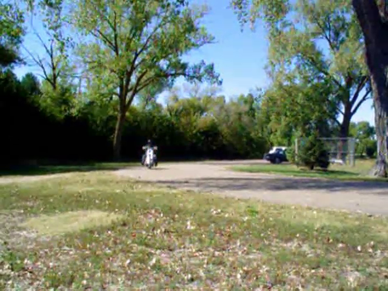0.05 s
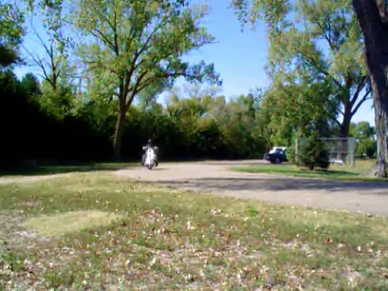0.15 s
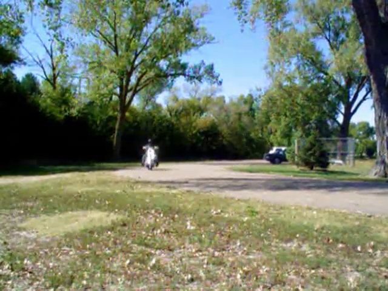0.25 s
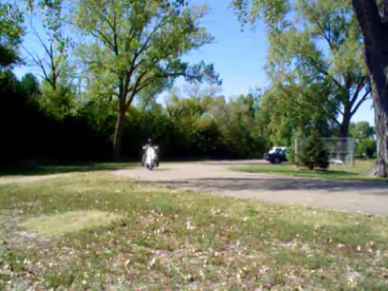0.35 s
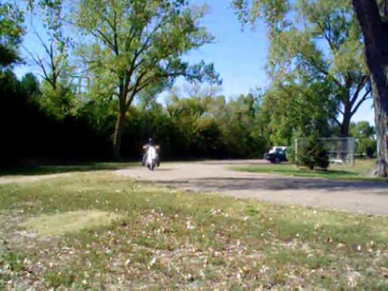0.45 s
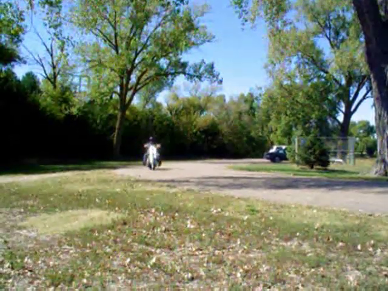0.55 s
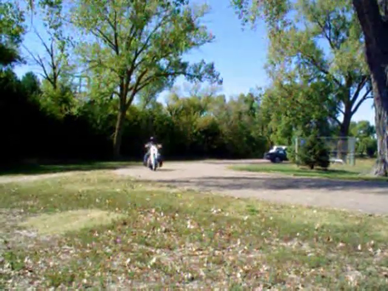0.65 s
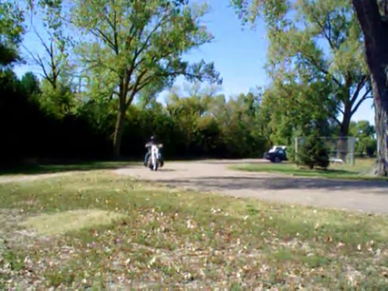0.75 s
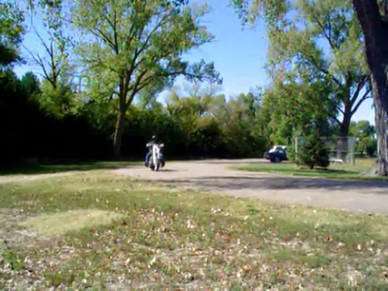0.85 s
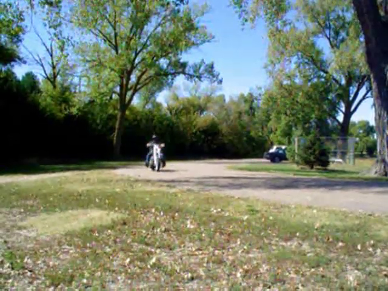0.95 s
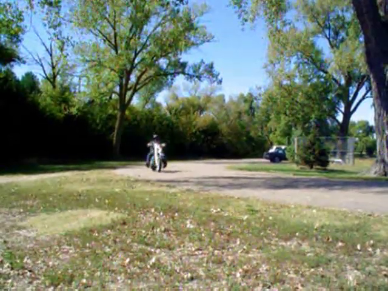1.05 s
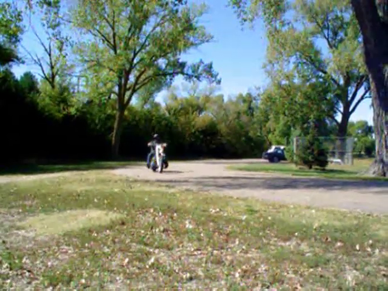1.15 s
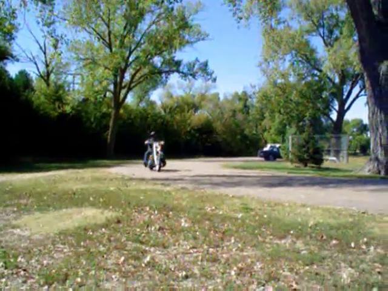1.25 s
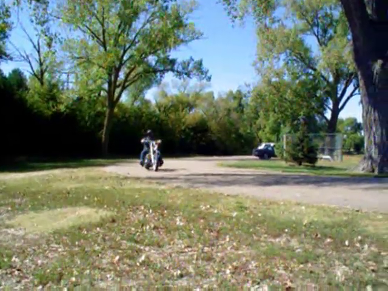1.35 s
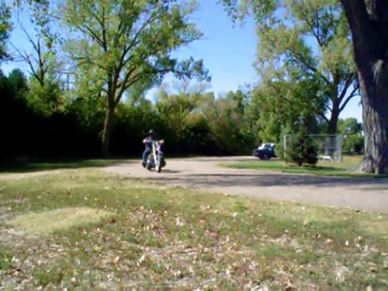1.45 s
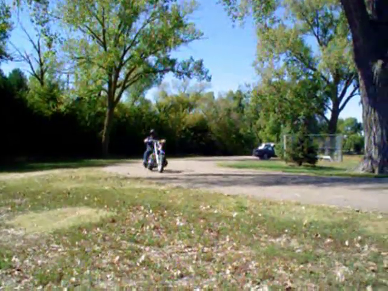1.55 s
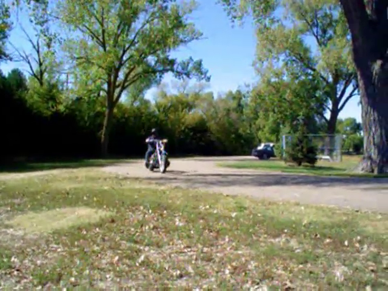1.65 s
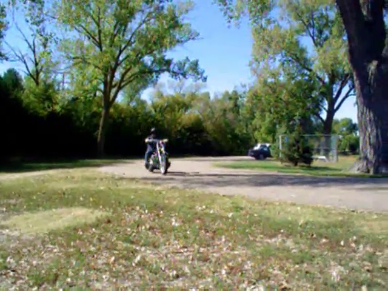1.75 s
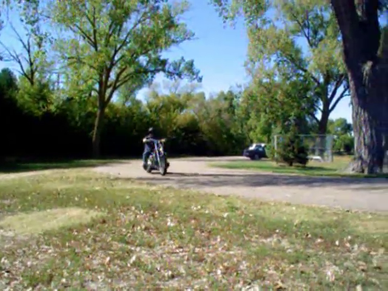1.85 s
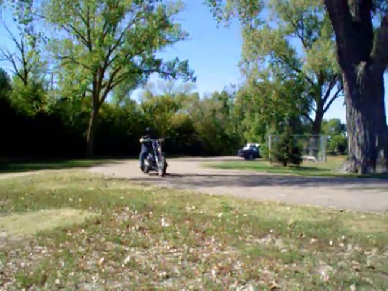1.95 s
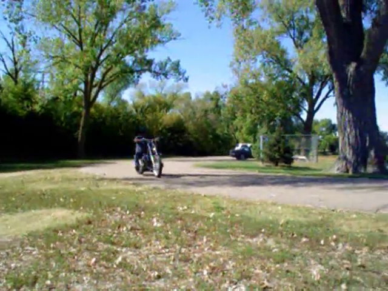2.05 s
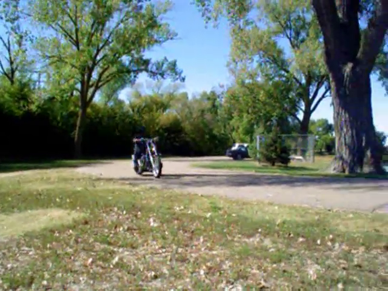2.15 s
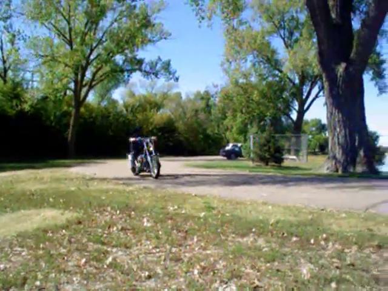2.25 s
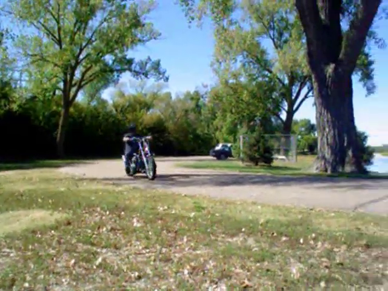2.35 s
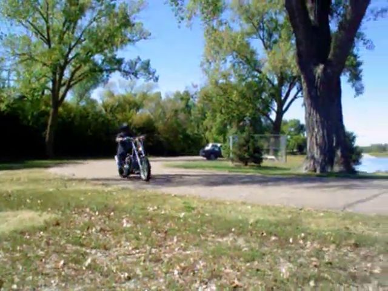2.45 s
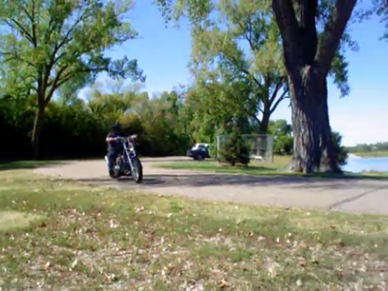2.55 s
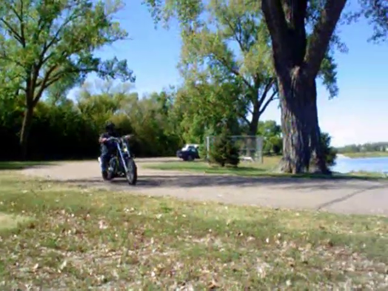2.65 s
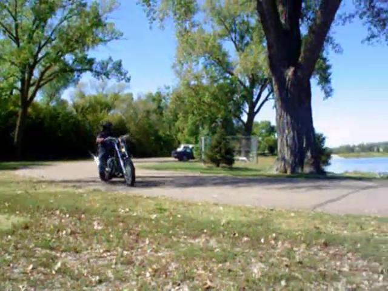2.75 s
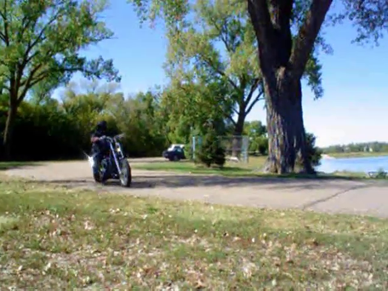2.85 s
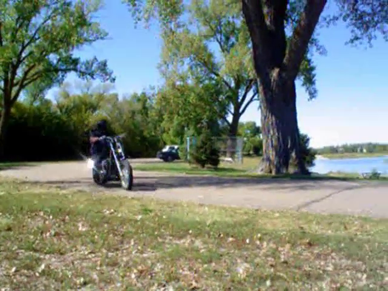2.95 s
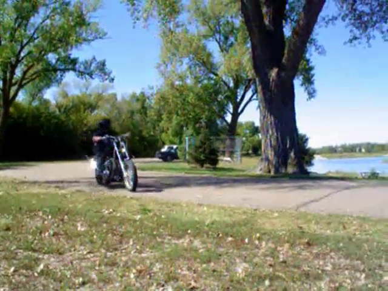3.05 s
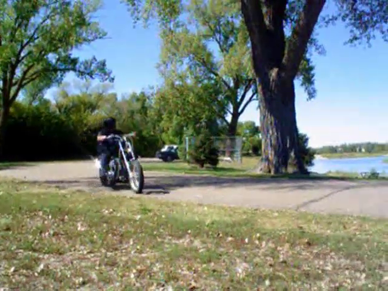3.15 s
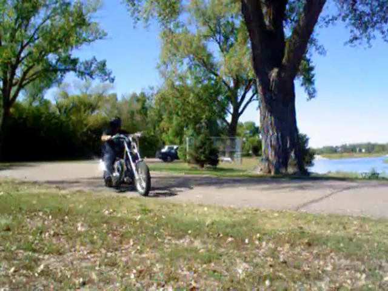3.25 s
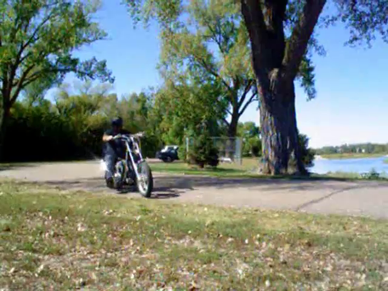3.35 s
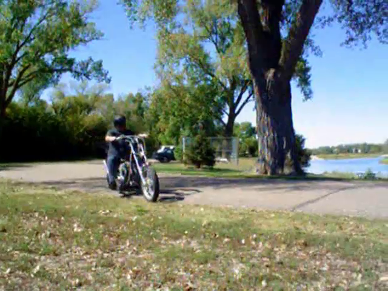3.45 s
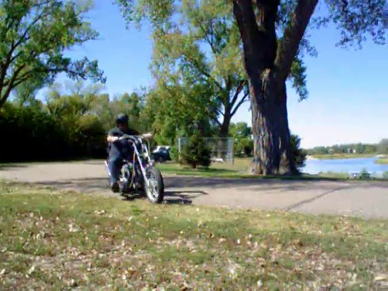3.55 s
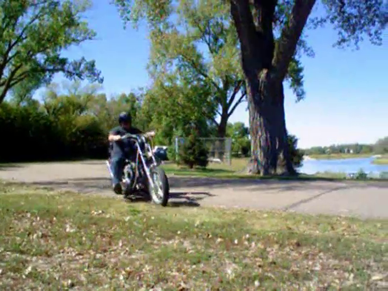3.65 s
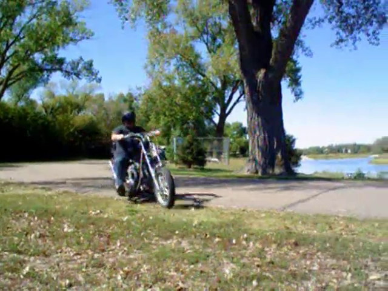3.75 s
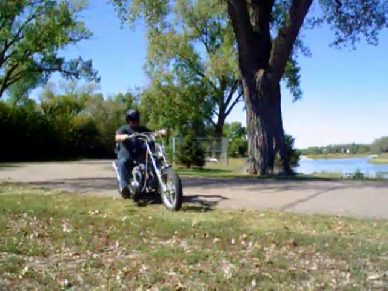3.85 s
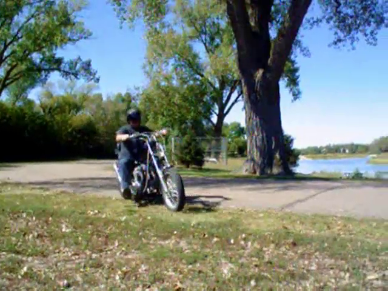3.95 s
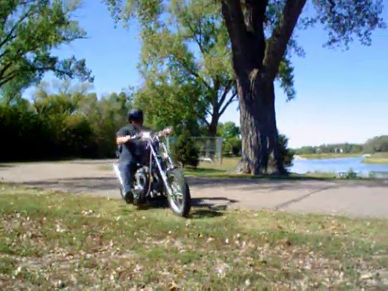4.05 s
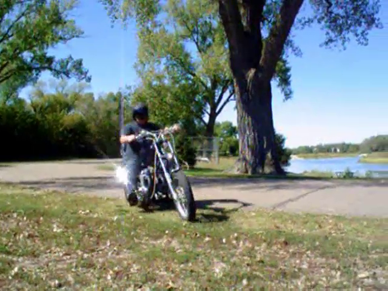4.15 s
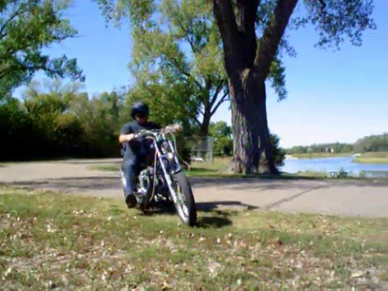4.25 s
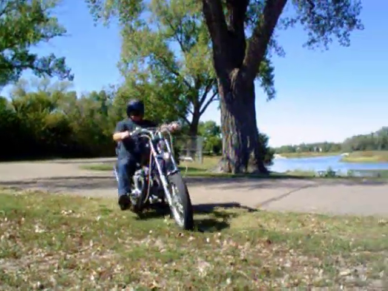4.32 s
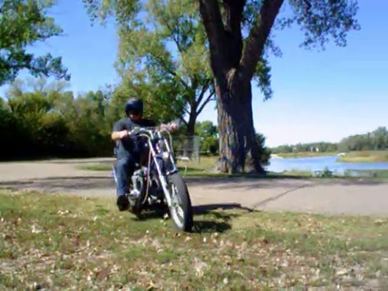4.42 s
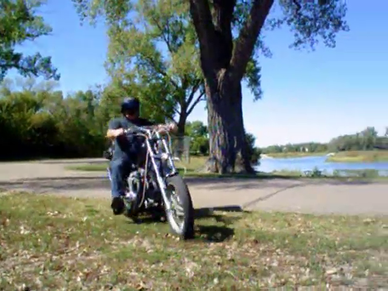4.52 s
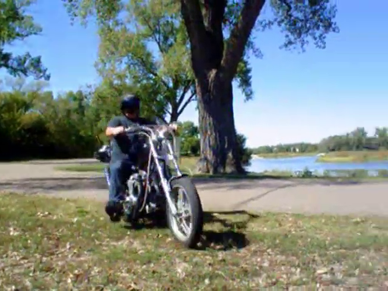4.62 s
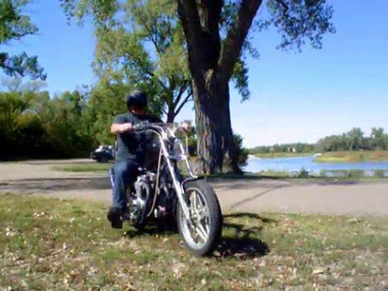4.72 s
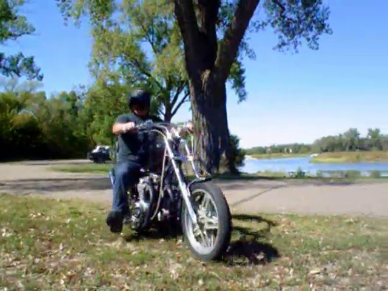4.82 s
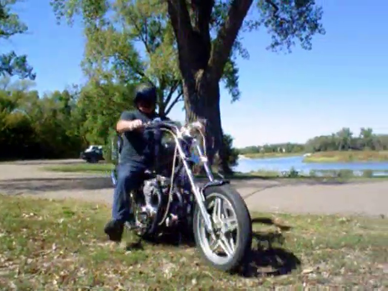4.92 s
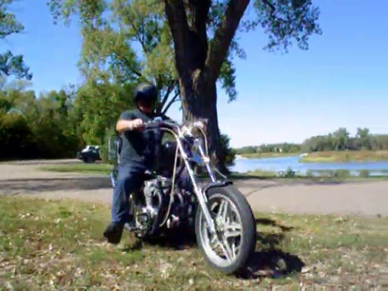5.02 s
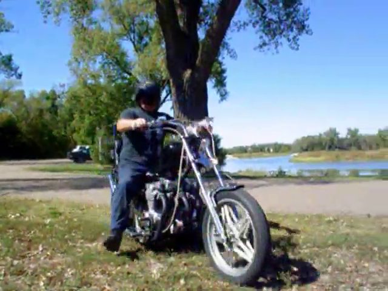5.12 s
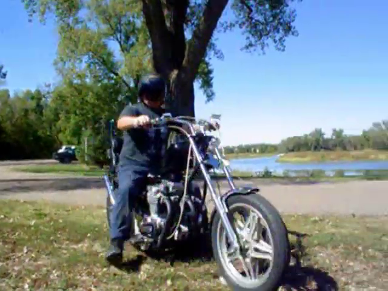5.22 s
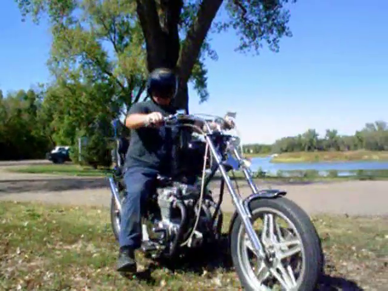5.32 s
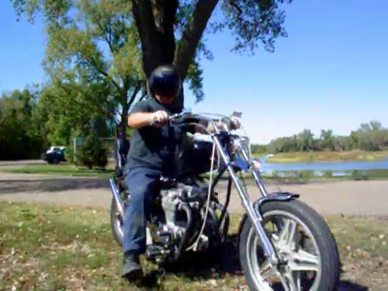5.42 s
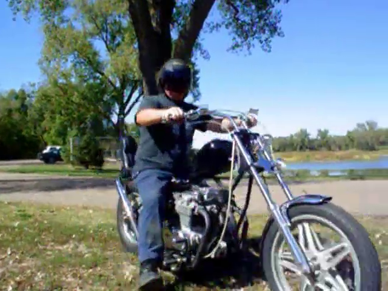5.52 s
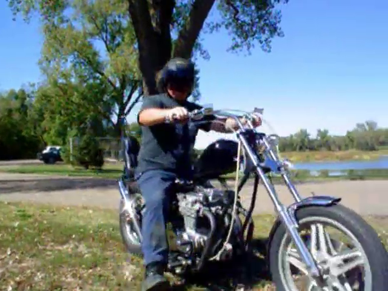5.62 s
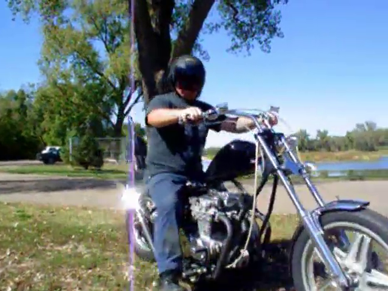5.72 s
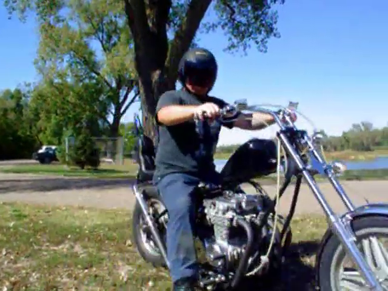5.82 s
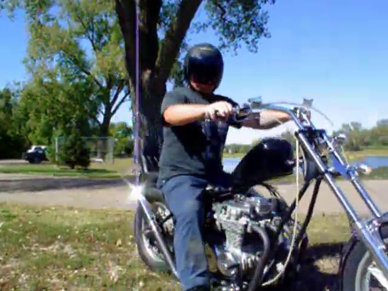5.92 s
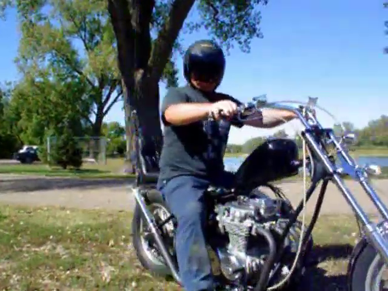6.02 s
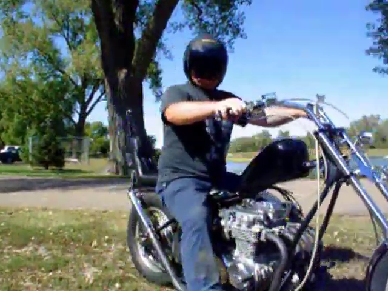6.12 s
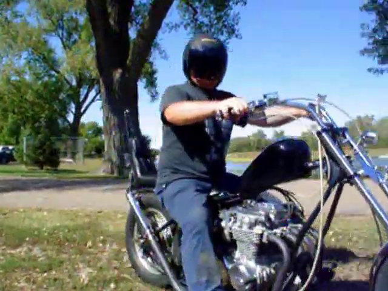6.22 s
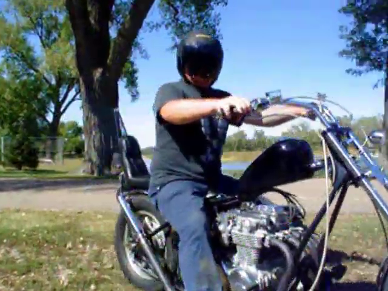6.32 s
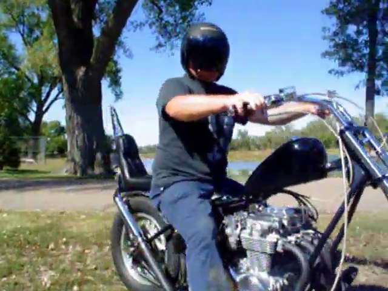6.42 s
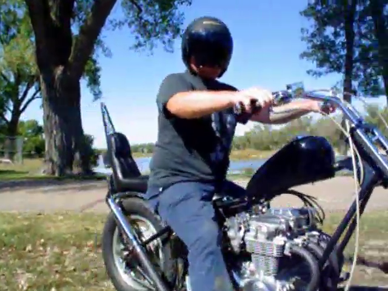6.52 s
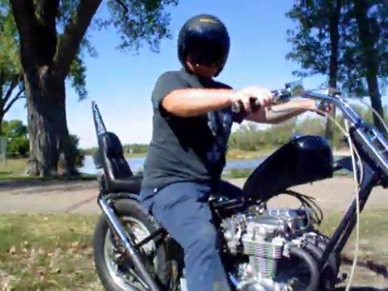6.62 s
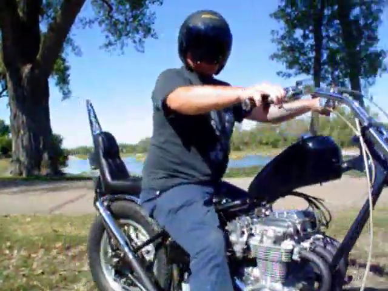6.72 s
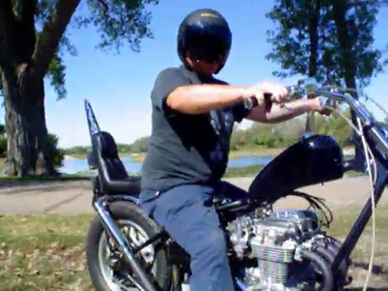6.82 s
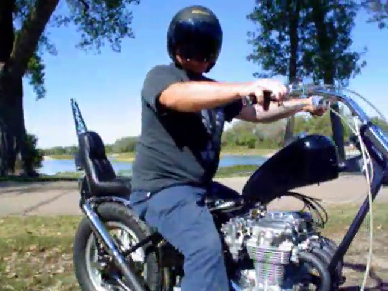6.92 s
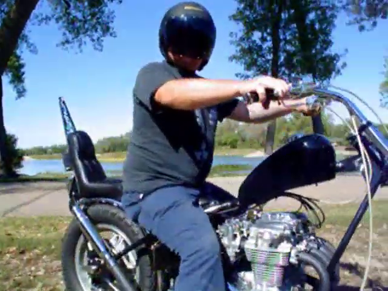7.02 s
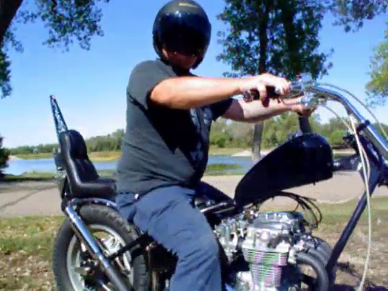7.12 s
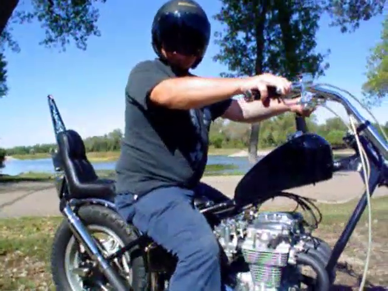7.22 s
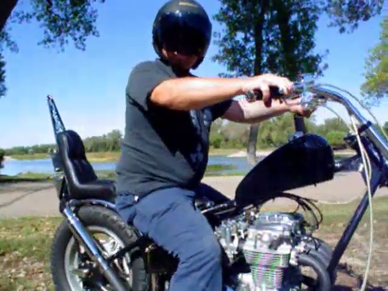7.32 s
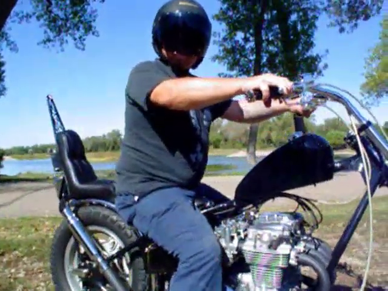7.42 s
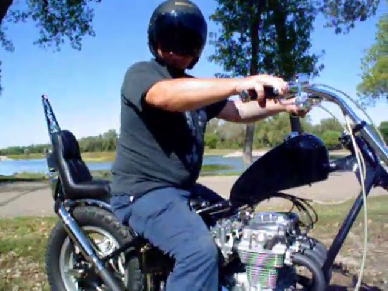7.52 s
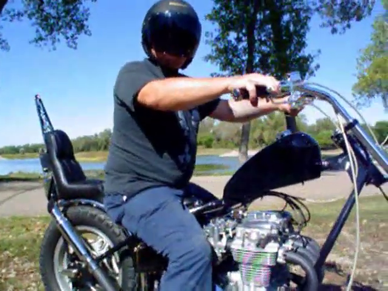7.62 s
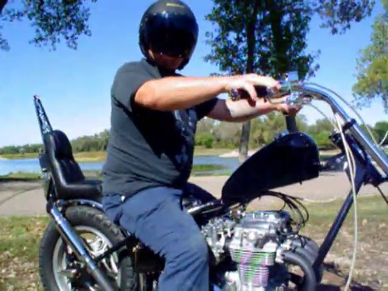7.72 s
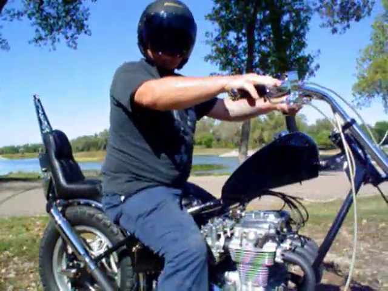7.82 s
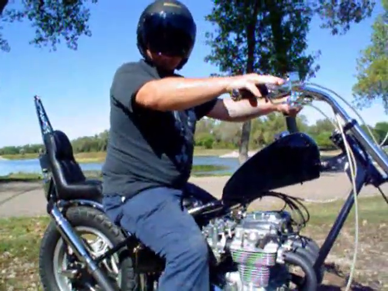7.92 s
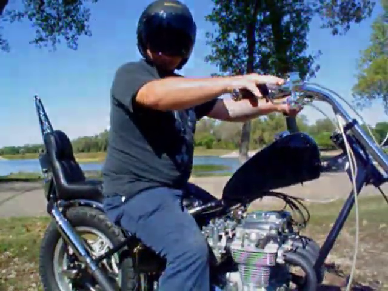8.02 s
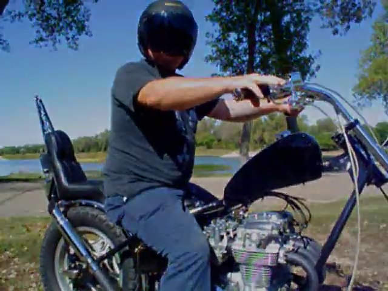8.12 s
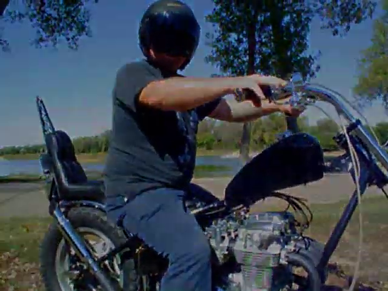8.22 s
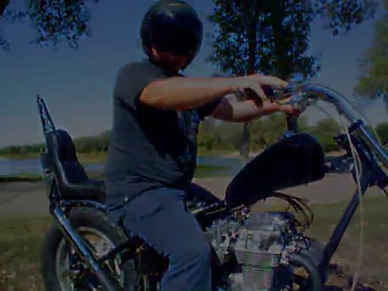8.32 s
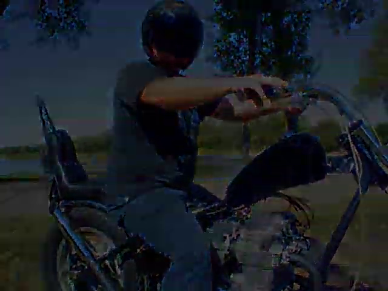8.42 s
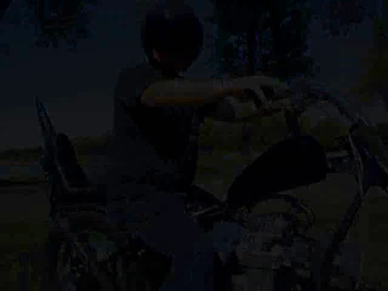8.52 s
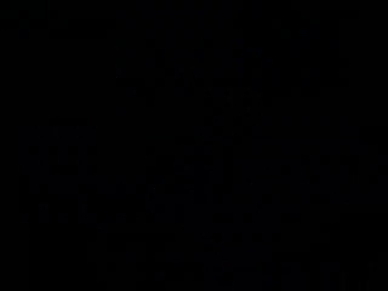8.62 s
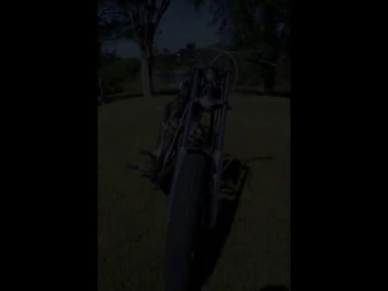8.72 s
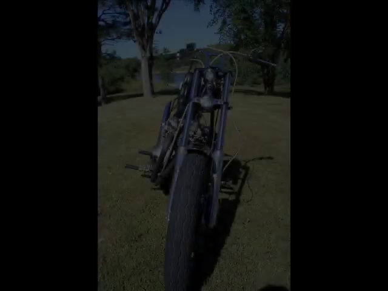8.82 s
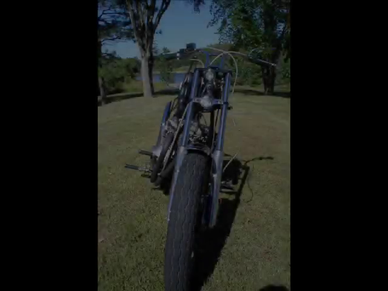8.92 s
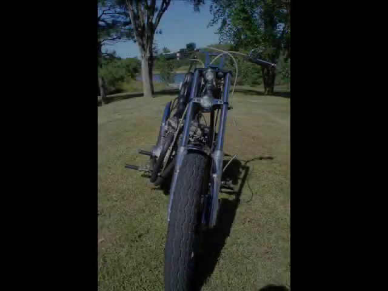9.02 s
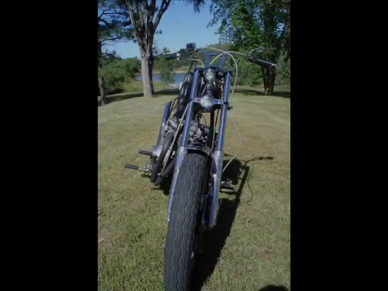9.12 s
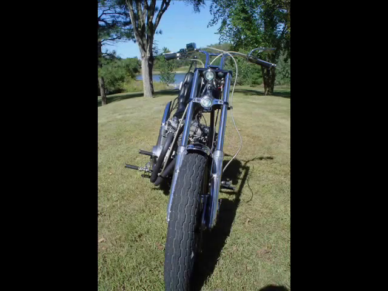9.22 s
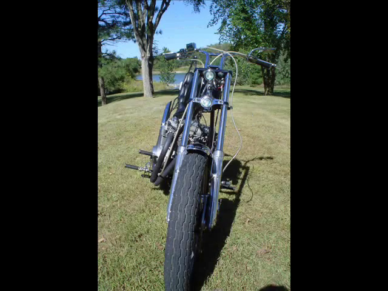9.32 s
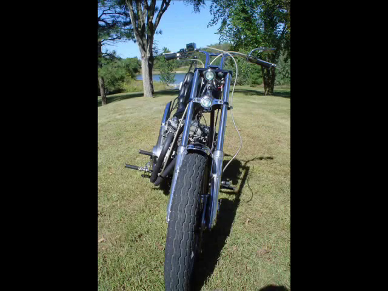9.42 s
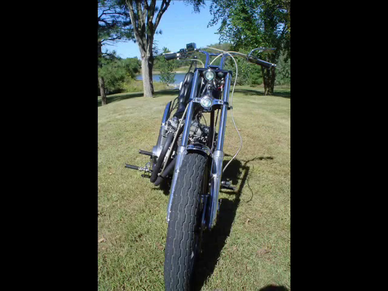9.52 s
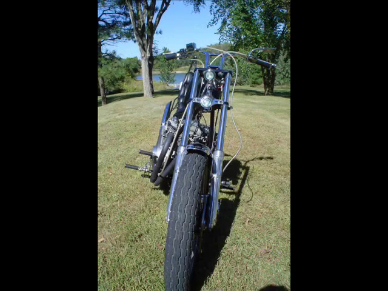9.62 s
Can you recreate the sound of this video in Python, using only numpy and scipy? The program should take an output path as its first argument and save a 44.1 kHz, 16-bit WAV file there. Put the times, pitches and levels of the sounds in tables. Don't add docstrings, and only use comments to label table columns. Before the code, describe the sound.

Open air, small camera microphone with little deep bass, slight overload and a very faint whine. From 0 s a four-cylinder motorcycle runs at a distance, a quick, boomy exhaust flutter at about 73 firings a second, slightly unsteady, with faint metallic knocks near 0.6, 2.8 and 3.5 s. From 1.2 to 4.5 s it slows toward 45 firings and comes nearer, the bark growing fuller. At 4.4-4.8 s dry leaves crunch and twigs snap sharply, loudest at 4.7; more cracks scatter from 5 to 6.3 s, with a hard knock at 5.25. By 6.5 s it halts close by, idling lumpily at 36-41 firings. Valve ticks, chain hiss and clutch rattle become prominent, strongest around 7.2-8.3 s, with a snap at 7.05 and faint fin pings. A final leaf crunch and dull bump come at 8.66 s; at 8.75 s everything cuts to silence, engine still running.

```python
import sys
import numpy as np
from scipy import signal
from scipy.fft import rfft, irfft
from scipy.io import wavfile
from scipy.ndimage import uniform_filter1d

SR = 44100
rng = np.random.default_rng(int(sys.argv[2]) if len(sys.argv) > 2 else 0)


def transcribe(u):
    v = np.clip(np.atleast_2d(u).T, -1, 1)
    q = np.round(v * 32767).astype(np.int16)
    wavfile.write(sys.argv[1], SR, q)


def gain_from_db(level_db):
    decades = np.asarray(level_db, float) / 20
    return 10 ** decades


N = 426006

# [time_s, distance_m, heading_deg]
PATH = [(0, 16.7, 1.3), (1, 18.6, 13), (2, 14.3, 25), (3, 11.06, 34), (4, 10.2, 41), (4.6, 6.94, 52.7),
        (5.4, 4.15, 66.5), (6, 3.8, 68.4), (6.6, 3.08, 69.6)]
# [time_s, firings_hz]
FIRING_RATE = [(0.0, 72.62), (0.6, 75.5), (1.2, 71.3), (1.6, 64.58), (2.6, 60.35), (3.2, 53.98),
               (4.0, 46.82), (4.4, 45.89), (4.6, 41.52), (5.6, 39.57), (5.8, 41.32), (6.0, 39.19),
               (7.0, 38.51), (7.2, 40.03), (7.6, 36.14), (8.0, 38.4), (8.4, 37.71), (8.75, 41.83)]
# [time_s, ahead_firings, width_s]
HUNT = [(0.2, 0.04, 0.07), (0.42, 0.078, 0.03), (0.6, -0.043, 0.075), (0.92, -0.09, 0.03),
        (1.05, 0.158, 0.04), (1.23, -0.041, 0.03), (1.59, -0.091, 0.055), (1.89, 0.1, 0.075),
        (2.44, -0.079, 0.075), (2.72, 0.064, 0.04), (3.4, -0.062, 0.04), (3.55, 0.03, 0.055),
        (3.74, -0.09, 0.03), (3.91, 0.107, 0.04), (4.09, -0.094, 0.04), (4.42, 0.017, 0.1),
        (4.59, -0.045, 0.03), (4.77, -0.032, 0.03), (4.99, 0.054, 0.075), (5.32, -0.088, 0.055),
        (5.59, 0.091, 0.04), (5.77, -0.065, 0.04), (5.94, 0.063, 0.055), (6.07, 0.035, 0.03),
        (6.19, -0.034, 0.03), (6.36, -0.024, 0.14), (6.85, 0.115, 0.075), (7.26, -0.067, 0.1),
        (7.5, 0.038, 0.03), (7.62, 0.087, 0.1), (7.74, 0.043, 0.03), (7.91, -0.051, 0.075),
        (8.05, -0.048, 0.03), (8.19, 0.064, 0.04), (8.3, -0.036, 0.03), (8.59, -0.085, 0.03)]
# [time_s, load_db]
LOAD = [(0, 12.5), (.7, 14), (.8, -3), (1, 9.5), (1.3, 8.5), (1.6, 4.5), (2.2, 6), (2.4, 10), (2.95, 8.5),
        (3.1, 10), (3.22, 12), (3.9, 14.5), (4, 11), (4.2, 13.5), (4.5, 10.5), (5.1, 5.5), (6.2, 6),
        (7.4, 7), (7.65, 9), (8.1, 7)]
# [pitch_hz, width_hz, level_db]
WHINE = [(11660, 250, -73.5), (11948, 8, -83), (12248, 8, -86.5), (12500, 292, -73.5)]
# [start_s, peak_db, centre_hz, t60_s]
LEAVES = [(4.3745, -26.5, 4620, 0.034), (4.3969, -26.5, 7140, 0.067), (4.4179, -25, 7700, 0.13),
          (4.439, -27, 6330, .1), (4.5136, -26.5, 6500, 0.16), (4.554, -47, 7500, 0.23),
          (4.6114, -22.5, 8530, 0.06), (4.636, -24, 6640, 0.38), (4.704, -1.5, 3500, .03),
          (4.71, -12.5, 6500, 0.05), (4.734, -23.5, 6500, 0.16), (4.7544, -26.5, 5750, 0.18),
          (5.02, -21, 7400, 0.026), (5.2225, -25, 5000, 0.068), (5.272, -22, 6000, 0.056),
          (5.293, -25, 6000, .04), (5.392, -14.5, 7500, 0.14), (5.572, -12.5, 6450, 0.058),
          (5.6005, -19.5, 8000, 0.04), (6.0813, -19.5, 7600, 0.22), (6.2627, -25, 7320, 0.027),
          (6.272, -17.5, 6960, 0.043), (6.286, -19, 7000, 0.069), (8.6572, -14, 5040, 0.067),
          (8.6906, -7, 7000, 0.027)]
# [start_s, peak_db, centre_hz]
SNAPS = [(4.4188, -18, 6000), (4.4221, -15, 6500), (4.4306, -18, 4800), (4.4407, -21, 4400),
         (4.4507, -19, 4200), (4.5148, -15, 6400), (4.5197, -18, 6400), (4.526, -17, 5200),
         (4.5365, -21, 5700), (4.54, -22, 6100), (4.6124, -18, 7400), (4.6431, -16, 4900),
         (4.6494, -19, 5100), (4.6549, -14, 5900), (4.6612, -14, 4300), (4.7167, -12, 5400),
         (4.7215, -17, 8800), (5.0334, -19, 4700), (5.2389, -16, 4800), (5.343, -17, 4300),
         (5.3938, -14, 7300), (5.3983, -11, 6400), (5.5743, -15, 5100), (5.5778, -13, 5400),
         (5.5823, -14, 5500), (5.6029, -15, 5100), (5.6175, -14, 4500), (5.8663, -12, 4800),
         (5.9332, -12, 5200), (5.9688, -15, 3800), (6.0892, -12, 6700), (6.2635, -13, 5900),
         (6.2751, -14, 6500), (6.6105, -14, 3600), (6.7877, -14, 4000), (7.0606, -9, 4500),
         (8.6581, -14, 3700), (8.6916, -9, 6200)]
# [start_s, length_s]
GAPS = [(4.46, 0.048), (4.538, 0.012), (4.59, 0.015), (4.622, .012), (4.68, 0.036), (4.719, 0.011),
        (5.382, 0.0072), (5.396, 0.014), (5.569, 0.0083), (5.87, 0.0098), (5.93, 0.012), (6.067, 0.013),
        (6.256, 0.011), (8.659, 0.021), (8.69, 0.03)]
# [start_s, peak_db, pitch_hz, t60_s]
KNOCKS = [(0.6317, -30, 965, 0.06), (0.632, -29, 1250, 0.032), (0.6322, -32, 2300, .008),
          (0.74, -58, 2300, 0.014), (2.7897, -32.5, 1010, 0.05), (2.791, -28, 1280, 0.027),
          (2.7995, -32, 940, .04), (2.8, -34, 1250, 0.036), (3.491, -27, 900, 0.019),
          (4.7124, -12.5, 3600, 0.0038), (4.7218, -12.5, 3280, 0.0041), (5.2565, -5, 3450, 0.0023),
          (5.294, -21.5, 1200, 0.035)]
# [start_s, peak_db, centre_hz, t60_s]
BUMPS = [
    (4.7135, -19, 1200, .04),
    (8.657, -12, 1000, 0.035),
]
# [start_s, peak_db, pitch_hz, t60_s]
PINGS = [(6.7516, -33, 7340, 0.054), (6.8573, -37, 7306, 0.06), (7.4744, -34, 7305, 0.055),
         (8.4392, -33.5, 7300, 0.049), (8.5405, -31, 7340, 0.052)]
# [freq_hz, level_db]
FAR_CLATTER = [(350, -5), (600, -8.5), (660, -17.5), (822, -10.5), (969, -11), (1480, -17.5), (1650, -12.5),
               (2860, -17), (3970, -23.5), (8300, -26), (9950, -31.5), (10150, -38), (13400, -37),
               (15800, -32)]
# [freq_hz, level_db]
NEAR_CLATTER = [(350, -14), (600, -3), (822, -6), (1210, -8), (1540, -8.5), (2260, -5.5), (2780, -6.5),
                (3190, -10), (4940, -13.5), (6400, -22.5), (9950, -22), (10150, -35.5), (12000, -37.5),
                (15800, -34.5)]
# [pitch_hz, width_hz, level_db]
CASES = [(981, 8, -7.5), (1197, 180, -5), (2027, 70, -11), (2550, 50, -3.5), (2782, 56, 3.5),
         (4084, 320, -20), (4970, 60, -11.5), (9300, 150, -30.5), (10660, 45, -37.5), (12530, 80, -41),
         (14900, 60, -18.5)]
# [time_s, level_db]
RATTLE = [(5, -9), (5.5, -0.5), (6.3, 1.5), (6.65, 9), (7, 9), (7.15, 14), (7.5, 15.5), (7.9, 11),
          (8.05, 13.5), (8.3, 9.5), (8.65, 12.5)]
# [boom_hz, boom_db, boom2_hz, boom2_db, shell_db, lag_ms]
PIPES = [(134, 6.5, 150, 9.5, -9.5, 0.069), (120.7, 12, 153.6, 17.5, 3.5, 0.98),
         (104, 4.5, 150, 11.5, -8, 0.66), (134, 1, 153.4, 19, -14, 0.15)]
# [heading_deg, cyl1_db, cyl2_db, cyl3_db, cyl4_db]
FACING = [(0, -.5, 1, -.7, .2), (20, -1.5, -2, 3.5, 0), (45, .5, -1, 1.6, -1.2), (70, 1.5, -.3, .2, -1.1),
          (90, 2.6, .2, .5, -3.2)]
# [heading_deg, cyl1_db, cyl2_db, cyl3_db, cyl4_db]
MOUTHS = [(0, -4, -3, -4, -2), (20, -8, -5, 0, -3), (45, -3, -4, 0, -4), (58, 0, -3, 0, -6),
          (77, 0, -7, -7, -10)]
# [pitch_hz, width_hz, cyl1_db, cyl2_db, cyl3_db, cyl4_db]
HEADERS = [(304, 61, 10, -1, -4.5, -5), (408.6, 25, 15.5, 6, 11.5, -11.5), (443, 47, 11, 15.5, -6, 13.5),
           (597, 110, 4, 0.5, -2, 3), (669, 49, 1, -5.5, 3, 5)]
# [pitch_hz, width_hz, cyl1_db, cyl2_db, cyl3_db, cyl4_db]
BARKS = [(232, 88, 3.5, 0.1, 0, -10.5), (259.2, 27, 4.5, 1.2, 3, -21), (285.6, 7.7, 3.5, 0.24, -7, -14.5)]
# [heading_deg, bark_db, headers_db, shell_db, low_boom_db]
AIM = [(0, 5, -0.5, -3, -31), (20.3, 9.5, -0.5, -12.5, -30), (40, 8.5, -6, -13, -6),
       (68, 5.5, -17.5, -16, 17), (83.1, 1, -6.5, -0.5, -15)]
# [heading_deg, level_db]
COLLECTOR = [(0, -35), (28, -8.5), (38, -4), (46, -1), (55, -6), (66, -4.5), (71, -9.5), (75, -30)]
# [time_s, level_db]
SHAKE = [(0, -17), (4.5, -5), (5.9, -7), (6.1, -12), (6.23, 2), (6.33, -3), (6.44, 9), (6.55, 1), (6.75, 2),
         (6.96, 0), (7.07, 4.5), (7.17, 5), (7.27, 5), (7.38, 4.5), (7.49, 5.5), (7.6, -2), (7.77, -2),
         (7.91, -0.5), (8.12, 5.5), (8.3, -0.5), (8.64, 5)]
# [time_s, share_0_1]
UPPER_BOOM = [(0, .8), (1.3, .6), (1.7, .1), (2.85, .1), (3.2, .8), (3.9, 0.5), (4.5, .1), (7.3, .1),
              (7.65, .4), (8, .1)]
# [firing_rate_multiple, level_db, turn_db_per_deg, late_firings]
CRANK_NOTES = [(4, 2, -0.45, 0.019), (6, -4.5, -0.2634, 0.026), (7, -19, -.5, 0.02), (8, 3, -.5, 0.023),
               (9, -7.5, -.5, 0.026), (3.75, -26, 0.3471, 0.046), (5, -15, 0.1, 0.023)]


def curves(table, along=None):
    x, *columns = np.transpose(table)
    along = np.arange(N) / SR if along is None else along
    return [np.interp(along, x, column) for column in columns]


def unit(x):
    return x / np.sqrt(uniform_filter1d(x ** 2, size=SR // 2) + 1e-12)


def noise():
    return rng.standard_normal(N)


def ring(x, hz, width_hz):
    return signal.lfilter(*signal.iirpeak(hz, hz / width_hz, fs=SR), x)


def modes(x, table, k):
    return sum((-1) ** j * gain_from_db(mode[2 + k]) * ring(x, *mode[:2]) for j, mode in enumerate(table))


def colour(x, table):
    hz, db = np.transpose(table)
    f = np.arange(N // 2 + 1) * SR / N + 1
    return irfft(rfft(x) * gain_from_db(np.interp(np.log(f), np.log(hz), db)), N)


def above(hz, order=24):
    return 1 / (1 + (hz / (np.arange(N // 2 + 1) * SR / N + 50)) ** order)


def walk(rate_hz):
    k = int(SR / rate_hz)
    steps = np.repeat(rng.standard_normal(N // k + 1), k)
    return 1.2 * uniform_filter1d(uniform_filter1d(steps, k), k)[:N]


def ramp(start_s, takes_s):
    return np.clip((np.arange(N) / SR - start_s) / takes_s, 0, 1)


def halt():
    return ramp(6.3, 0.4)


def hat(width_s):
    u = np.arange(-256, 257) / SR / width_s
    return (1 - u ** 2) * np.exp(-u ** 2 / 2)


def camera_whine():
    whine = sum(gain_from_db(db) * unit(ring(noise(), hz, width_hz)) for hz, width_hz, db in WHINE)
    return whine + gain_from_db(-63) * unit(ring(noise(), 35, 50))


def cracks(events, spread, grains_hz, rise_s):
    out, t = np.zeros(N), np.arange(SR // 10) / SR
    size = (len(events), len(t))
    chance = rng.standard_normal(size) * (rng.random(size) < grains_hz / SR)
    for (s, db, hz, t60_s), snaps in zip(events, chance):
        shape = (1 - np.exp(-t / rise_s)) * np.exp(-np.log(1000) * t / t60_s)
        burst = ring(ring(snaps * shape, hz, spread * hz), hz, 2 * spread * hz)
        i = int(s * SR)
        out[i:i + len(t)] += gain_from_db(db) * burst / np.abs(burst).max()
    return out


def knocks():
    out, t = np.zeros(N), np.arange(SR // 10) / SR
    for s, db, hz, t60_s in KNOCKS:
        i = int(s * SR)
        out[i:i + len(t)] += gain_from_db(db) * np.sin(2 * np.pi * hz * t) * np.exp(-np.log(1000) * t / t60_s)
    return out


def crushed_leaves(gap):
    split_hz, copy_hz, top_db = 10050, 5400, -8
    leaves = cracks(LEAVES, spread=1.0, grains_hz=7000, rise_s=.0012)
    leaves *= 1 - .8 * uniform_filter1d(1. * gap, size=64)
    snaps = [(s, db - 5, hz, 0.0073) for s, db, hz in SNAPS]
    leaves += cracks(snaps, spread=0.89, grains_hz=21000, rise_s=.0001)
    top_share = above(split_hz, order=80)
    shifted = leaves * np.cos(2 * np.pi * copy_hz * np.arange(N) / SR)
    return irfft(rfft(leaves) * (1 - top_share) + gain_from_db(top_db) * rfft(shifted) * top_share, N)


def clatter(phase, clatter_db, hiss_db, busy, near, gap):
    ticks_hz, flicker_db, surge_db = 1500, 1, 2.6
    beat = gain_from_db(0.76 * np.cos(2 * np.pi * (phase - .15)) + 0.62 * np.cos(np.pi / 2 * (phase - 1.2)))
    tick_db = 2.0 * np.minimum(rng.exponential(size=N), 3)
    ticks = (rng.random(N) < ticks_hz / SR) * noise() * gain_from_db(tick_db)
    drive = beat * (unit(ticks) * 0.52 + noise())
    broad = (1 - near) * unit(colour(drive, FAR_CLATTER)) + near * unit(colour(drive, NEAR_CLATTER))
    cases = sum(gain_from_db(db + flicker_db * walk(30)) * ring(drive, hz, width_hz) / width_hz ** .25
                for hz, width_hz, db in CASES)
    cases_db = -16 + curves(RATTLE)[0] + surge_db * walk(16)
    spectrum = rfft(broad + gain_from_db(cases_db) * unit(cases))

    patch_hz, drop_db = (5200, 6300, 7600, 8800, 10050), -16
    body = irfft(spectrum * (above(130) - above(patch_hz[0])), N)
    hiss = irfft(spectrum * above(patch_hz[-1]), N) * gain_from_db(0.5)
    block = np.arange(N) // 512
    for lo, hi in zip(patch_hz, patch_hz[1:]):
        dropped = rng.random(N // 512 + 1)[block] < .12 * near + .15 * busy[block * 512]
        dropped |= gap & (rng.random(N // 512 + 1)[block] < .75)
        patch = irfft(spectrum * (above(lo) - above(hi)), N)
        hiss += patch * gain_from_db(drop_db * uniform_filter1d(1. * dropped, size=128))
    body_db = clatter_db + 2.0 + 0.34 * walk(16)
    return gain_from_db(body_db) * unit(body) + gain_from_db(hiss_db - 0.12 + 0.26 * walk(25)) * unit(hiss)


def pressure_beat(phase):
    idle_hz, power = 39, 1.1
    beat = (np.gradient(phase) * SR / idle_hz) ** power * np.cos(2 * np.pi * (phase - .36))
    beat += gain_from_db(-4.0) * np.cos(4 * np.pi * (phase - .17))
    beat *= 1 + .4 * np.cos(np.pi / 2 * phase) + .35 * np.cos(np.pi * phase)
    return beat + gain_from_db(-12) * unit(ring(ring(noise(), 78, 60), 78, 60))


def crank_notes(phase, heading):
    return sum(gain_from_db(db + turn_db * heading) * np.cos(np.pi / 2 * round(4 * multiple) * (phase - late))
               for multiple, db, turn_db, late in CRANK_NOTES)


def fire_pipes(phase, heading, low_db):
    timing_scatter, size_scatter_db, puff_scatter_s, facing_weight = .008, 1.4, .0008, 1.6
    boom_width_hz, shell_hz, shell_width_hz = 23, 466, 26
    count = np.arange(4, int(phase[-1]) - 1)
    timing, fire_size, puff_size, lateness = rng.standard_normal((4, len(count)))
    at = np.interp(count + timing_scatter * timing, phase, np.arange(N))
    facing, mouths, rolling = curves(FACING, heading), curves(MOUTHS, heading), 1 - halt()
    boom, bark, shell, tubes, fires, puffs, gusts, third_gust = np.zeros((8, N))
    for k, (hz, db, hz2, db2, shell_db, lag_ms) in enumerate(PIPES):
        mine = count % 4 == k
        where = np.minimum(at[mine] + lag_ms * SR / 1000, N - 1).astype(int)
        late = np.abs(puff_scatter_s * SR * lateness[mine] * rolling[where]).astype(int)
        fire, puff, gust, blow = np.zeros((4, N))
        fire[where] = -gain_from_db(size_scatter_db * fire_size[mine])
        puff_db = size_scatter_db * puff_size[mine]
        puff[where] = gain_from_db(puff_db + facing_weight * facing[k][where])
        gust[where + late] = gain_from_db(puff_db + mouths[k][where])
        blow[where + late] = fire[where]
        boom += gain_from_db(db + low_db) * ring(fire, hz, boom_width_hz) + gain_from_db(db2) * ring(fire, hz2, boom_width_hz)
        bark += modes(blow, BARKS, k)
        plate = ring(fire, shell_hz, shell_width_hz) - gain_from_db(-4.0) * ring(fire, 560, shell_width_hz)
        shell += gain_from_db(shell_db) * (plate + gain_from_db(-3) * ring(fire, 671, 50))
        tubes += modes(puff, HEADERS, k)
        fires += fire
        puffs += puff
        gusts += gust
        if k == 2:
            third_gust = gust
    return boom, bark, shell, tubes, fires, puffs, gusts, third_gust


def low_boom(boom):
    low = unit(boom) + gain_from_db(-13) * unit(ring(noise(), 120, 31))
    share = np.clip(curves(UPPER_BOOM)[0], 0, 1)
    return (1 - share) * ring(low, 120, 84) + share * ring(low, 152, 40)


def exhaust(phase, heard_db, heading):
    aim_db, tubes_db, shell_db, low_db = curves(AIM, heading)
    load_db, shake_db, halted = curves(LOAD)[0], curves(SHAKE)[0], halt()
    boom, bark, shell, tubes, fires, puffs, gusts, third_gust = fire_pipes(phase, heading, low_db)

    thump = signal.fftconvolve(np.roll(gusts, -int(.001 * SR)), -hat(.001), "same")
    upper = gain_from_db(-1.5 + 2 * halted) * unit(thump)
    upper += gain_from_db(-3.0 - 7 * halted) * unit(ring(bark, 277, 130))
    shell = np.roll(ring(shell, 480, 90), -int(.0055 * SR))
    upper += gain_from_db(shell_db + 5 * halted + shake_db) * unit(shell)
    pop = signal.fftconvolve(np.roll(third_gust, int(.002 * SR)), hat(.0005), "same")
    body = ring(ring(bark, 225, 120), 225, 150)
    upper += halted * (gain_from_db(-12 + shake_db / 2) * unit(pop) + gain_from_db(-6.5) * unit(body))
    upper += gain_from_db(curves(COLLECTOR, heading)[0]) * unit(ring(ring(puffs, 246.2, 17), 246.2, 90))
    gas = (1.0 + np.exp(-(phase % 1) / 1.3)) * ring(ring(noise(), 550, 390), 220, 480)
    upper += gain_from_db(tubes_db) * (unit(tubes) + gain_from_db(-11 - 5.0 * halted) * unit(gas))
    upper += gain_from_db(-17.5 - .5 * heading) * unit(ring(ring(fires, 597, 31), 597, 200))
    upper -= 0.72 * ramp(4.9, 0.36) * ring(upper, 333, 98)

    bark_db = heard_db + aim_db + 0.033 * (load_db - load_db.mean())
    pipes = gain_from_db(heard_db + load_db - 1.5) * unit(low_boom(boom)) + gain_from_db(bark_db - 3.4) * upper
    pipes += gain_from_db(heard_db) * crank_notes(phase, heading)
    pipes = signal.sosfiltfilt(signal.butter(2, 90, "high", fs=SR, output="sos"), pipes)
    return pipes + gain_from_db(heard_db - 15.5) * pressure_beat(phase)


def crank_phase(rate_hz):
    t = np.arange(N) / SR
    coarse = t[::64]
    hunt = sum(ahead * np.exp(-((coarse - s) / width_s) ** 2 / 2) for s, ahead, width_s in HUNT)
    return 3.11 + np.cumsum(rate_hz) / SR + np.interp(t, coarse, hunt)


def scene():
    idle_db, idle_hz, speed_power, stop_m = -24, 39, 0.48, 1.6
    near_m, near_power = 2.14, 1.2
    t = np.arange(N) / SR
    rate_hz, (metres, heading) = curves(FIRING_RATE)[0], curves(PATH)
    phase = crank_phase(rate_hz)
    heard_db = idle_db + 20 * np.log10((rate_hz / idle_hz) ** speed_power * stop_m / metres)
    hiss_db = heard_db - 10
    near = np.clip((near_m / metres) ** near_power, 0, 1)
    gap = np.any([(t > s) & (t < s + length_s) for s, length_s in GAPS], axis=0)

    mix = camera_whine()
    leaves = crushed_leaves(gap)
    busy = np.clip(2.5 * uniform_filter1d(np.abs(leaves), size=SR // 9) / gain_from_db(hiss_db), 0, 1)
    mix += leaves + knocks()
    mix += cracks(BUMPS, spread=0.8, grains_hz=11000, rise_s=.00029)
    mix += cracks(PINGS, spread=0.015, grains_hz=2000, rise_s=.0014)
    mix += clatter(phase, heard_db, hiss_db, busy, near, gap)
    mix += exhaust(phase, heard_db, heading)
    return mix[None]


def roll_off(x):
    return signal.sosfilt(signal.butter(12, 16880, fs=SR, output="sos"), x)


def record(dry):
    cut_s, top_hz = 8.745, 15730
    x = signal.lfilter(*signal.butter(2, 30, "high", fs=SR), dry)
    x = np.tanh(1.387 * x) / 0.84
    x = signal.sosfilt(signal.ellip(16, .3, 60, top_hz, fs=SR, output="sos"), x)
    t = np.arange(N) / SR
    gate = np.clip((cut_s - t) / 0.0013, 0, 1)
    gate += gain_from_db(-17.0) * np.clip((cut_s + 0.015 - t) / 0.012, 0, 1)
    mix = x * gate
    return roll_off(mix)


dry = scene()
out = record(dry)
transcribe(out)
```